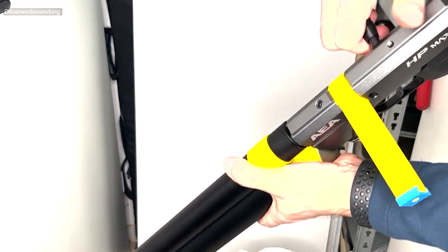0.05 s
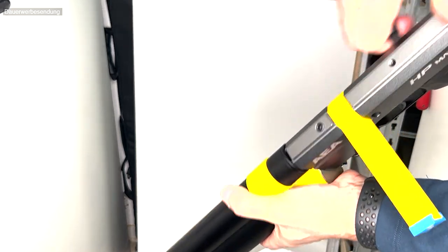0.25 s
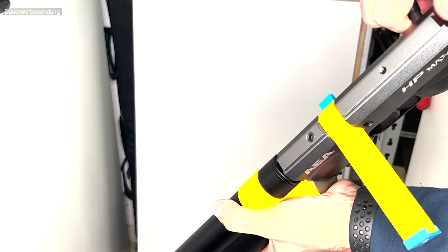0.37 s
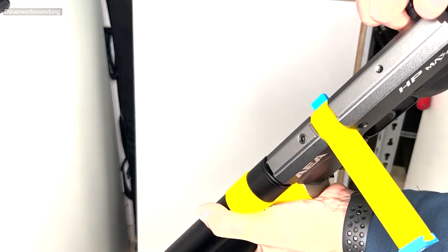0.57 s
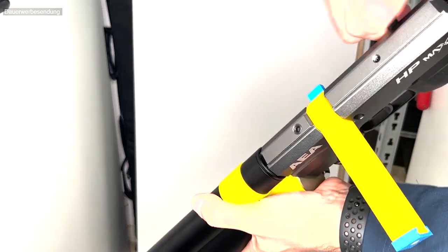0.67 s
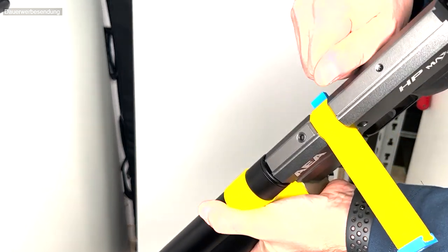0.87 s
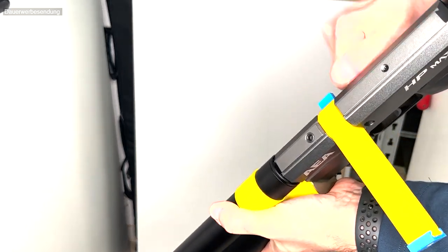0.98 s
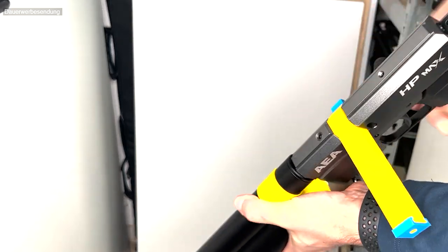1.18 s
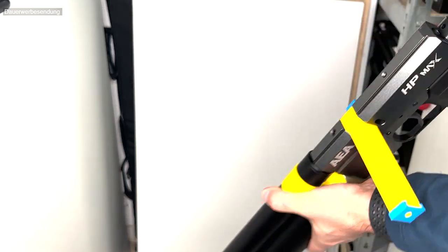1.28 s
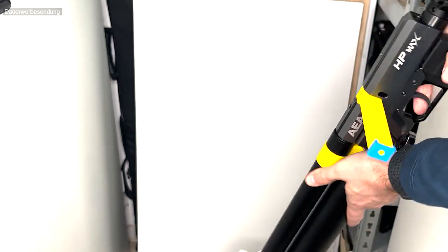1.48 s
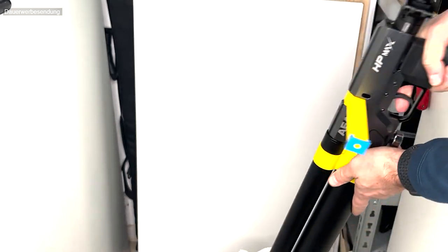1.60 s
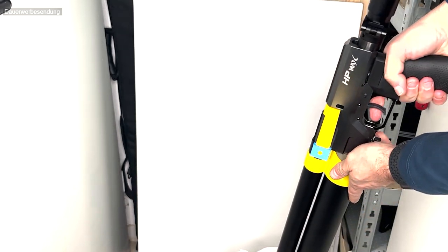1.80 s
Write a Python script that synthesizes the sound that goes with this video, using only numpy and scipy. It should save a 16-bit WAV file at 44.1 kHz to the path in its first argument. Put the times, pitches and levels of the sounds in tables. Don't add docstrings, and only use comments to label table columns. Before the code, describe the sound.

An air rifle's metal lever is worked close to a phone in a small workshop. After faint palm rubbing, it clatters back at 0.2-0.3 s with gritty steel scrapes, ringing knocks and a low tube hum. It slides forward from 0.6 s, the hardest, brightest snap landing near 0.73 s. A lighter latch click comes at 1.0 s, then quiet hand rustle and tiny ticks until about 1.85 s, over short room reverberation and faint hiss.

```python
import sys
import numpy as np
from scipy import signal
from scipy.fft import rfft, irfft
from scipy.io import wavfile

SR = 44100
rng = np.random.default_rng(int(sys.argv[2]) if len(sys.argv) > 2 else 0)


def to_linear_factor(level_db):
    exponent = np.asarray(level_db, float) / 20
    return 10 ** exponent


def store_wav(level_fs):
    pcm = np.round(np.clip(np.atleast_2d(level_fs), -1, 1) * 32767)
    wavfile.write(sys.argv[1], SR, pcm.T.astype(np.int16))


N = 81585


def unit(x):
    return x / np.sqrt(np.mean(x ** 2))


def read(table, hz, col=1):
    table = np.array(table, float)
    return np.interp(np.log(hz + 1), np.log(table[:, 0]), table[:, col])


def passed(x, kind, hz):
    return signal.sosfilt(signal.butter(2, hz, kind, fs=SR, output="sos"), x)


def band(x, hz):
    return unit(passed(x, "band", [hz / 1.7, hz * 1.7]))


def colour(x, table):
    cepstrum = irfft(np.log(to_linear_factor(read(table, np.fft.rfftfreq(2048, 1 / SR)))))
    cepstrum[1:1024] *= 2
    cepstrum[1025:] = 0
    h = irfft(np.exp(rfft(cepstrum)))[:1024]
    return signal.fftconvolve(x, h / np.sqrt(np.sum(h ** 2)))[:len(x)]


def fade(t, t60):
    return np.exp(-np.log(1000) * t / t60)


def ring(hz, db, t60, length):
    t = np.arange(int(length * SR))[:, None] / SR
    return np.sum(to_linear_factor(db) * np.sin(2 * np.pi * hz * t) * fade(t, t60), axis=1)


def cluster(hz, db, t60, chance):
    detune, uneven = chance[:16 * len(hz)].reshape(2, -1)
    hz, db, t60 = (np.repeat(v, 8) for v in (hz, db, t60))
    h = ring(hz * (1 + .06 * detune), db + 3 * uneven, np.minimum(t60, .055), .08)
    return h / np.sqrt(np.sum(h ** 2))


def add(out, s, x):
    i = int(s * SR)
    out[i:i + len(x)] += x[:N - i]


def grains(curve, spread_db):
    grains_per_s = 7000
    t, curve, chance = np.arange(N) / SR, np.array(curve), rng.random((3, N))
    hit = chance[0] < grains_per_s / SR
    size = to_linear_factor(-spread_db * np.log(1 - .97 * chance[2]))
    clicks = hit * np.sign(chance[1] - .5) * size
    return unit(clicks) * to_linear_factor(np.interp(t, curve[:, 0], curve[:, 1], -140, -140))


# (f/Hz, level/dB)
CONTACT = [(100, -60), (400, -11.5), (1000, -10), (1800, 4.5), (4800, -1.5), (8000, -3.5), (13000, -7)]


def slide(x, modes, ring_db):
    bare_db = -2
    h = cluster(*np.array(modes).T, rng.standard_normal(240))
    return to_linear_factor(ring_db) * signal.fftconvolve(x, h)[:N] + to_linear_factor(bare_db) * colour(x, CONTACT)


# (t/s, level/dB)
STROKES = [
    [(.185, -54.5), (.195, -34.5), (.203, -25.5), (.215, -33), (.245, -32), (.256, -25.5), (.27, -29.5),
     (.295, -26.5), (.315, -33)],
    [(.585, -72), (.605, -52.5), (.617, -34), (.636, -34.5), (.648, -20.5), (.669, -30.5), (.726, -35),
     (.734, -28), (.82, -56.5)],
    [(.96, -57.5), (.975, -55.5), (.981, -46), (.99, -27), (1.005, -22), (1.03, -46), (1.048, -37.5)],
]
# (f/Hz, level/dB, t60/s)
BACK = [(1248, -7, 0.2), (1900, -10.5, 0.15), (1966, 4.5, 0.23), (3140, -5, 0.24), (3870, 1, 0.055),
        (4400, -4, 0.045), (6440, -14.5, 0.14), (7350, -11, 0.028), (8190, 1.5, 0.04)]
HOME = [(770, -45, 0.17), (1984, 3, 0.16), (2580, -2.5, 0.24), (3200, 3, 0.02), (4200, -1, 0.027),
        (4760, -8.5, 0.18), (5600, -3, 0.13), (7655, -4, 0.18)]
LATCH = [(1710, -4, 0.15), (2029, 4, 0.18), (2508, -1, 0.15), (3370, -3.5, 0.16), (3920, 0.5, 0.033),
         (4900, -1.5, 0.023), (6900, -18, 0.1), (8000, -5.5, 0.028)]


def lever():
    return sum(slide(grains(c, 3.5), modes, -5) for c, modes in zip(STROKES, (BACK, HOME, LATCH)))


# (t/s, peak level/dB, ring
# f/Hz, crack level against ring/dB, chatter/ms)
KNOCKS = [(0.1985, -18, 4277, -4.5, 2.4), (0.2559, -15.5, 1860, 17, 2), (0.2601, -11.5, 1900, 2, 1.3),
          (0.262, -15.5, 8020, 0.5, 1.3), (.279, -14.5, 2243, 4.5, 0.79), (.361, -34, 1980, -16, 10),
          (0.621, -22.5, 3200, -8, 1.5), (0.632, -33.5, 8000, -8, 0.61), (0.6439, -17.5, 3342, 17.5, 3),
          (.649, -17, 4710, 6.5, 4.3), (0.689, -18, 2173, -4, 1.1), (0.7291, -11, 7480, 14, 0.74),
          (0.735, -14.5, 2510, -4, 2.7), (0.74, -18, 4320, 1.5, 4.3), (.97, -39.5, 4900, -10, 7.6),
          (0.997, -20, 4200, 4.5, 1.3), (1.005, -20.5, 2074, -3, 3.4), (1.024, -18.5, 1710, -8, 2.1),
          (1.036, -24.5, 1774, -7.5, 2), (1.107, -40.5, 7760, 11.5, 1.7),
          (.179, -50.5, 3280, -5, 0.84),
    (1.212, -48.5, 2120, 15.5, 1.95),
    (1.359, -51.5, 1700, 12, 12.5),
    (1.449, -55.5, 3040, -5, 2),
    (1.474, -42.5, 900, -4, 2.46),
    (1.51, -43, 1730, -24, 9.6),
    (1.566, -41.5, 1830, 4.5, 5.7),
    (1.801, -66.5, 2226, -11, 10.7),
    (1.84, -56, 3020, 20, 4.4),
          (0.2012, -15.5, 4290, 4.5, 1.5), (.2525, -31.5, 13560, -6, 2.4), (0.2673, -14, 12370, 2.5, .5),
            (0.272, -24, 7760, 4.5, 0.28), (0.2801, -14.5, 7600, 1, 0.83), (0.2894, -23.5, 2130, 3.5, 2),
            (0.3, -19, 1512, -1, 2), (0.6121, -32.5, 6900, 2, 5), (0.7282, -17.5, 12980, 3.5, .5),
            (0.7504, -22.5, 4640, 1.5, 1.9), (.974, -43, 12300, 9, 1), (.9855, -25, 4350, 0.5, 5.1),
            (0.9982, -21.5, 11770, 10, 1), (1.0453, -37.5, 1957, -11, 1.2), (1.286, -59, 2520, 0.5, 2.5),
            (1.565, -42, 7370, 11, 1)]
# (f/Hz, level/dB)
CRACK = [(300, -32), (2000, -3.5), (6000, -1.5), (13000, 1.5)]


def knocks():
    near_oct, ring_share, own_t60_s = .7, .5, .012
    rings, cracks = np.zeros(N), np.zeros(N)
    events = KNOCKS
    for (s, db, hz, crack_db, ms), c in zip(events, rng.standard_normal((len(events), 2200))):
        modes = BACK if s < .5 else HOME if s < .9 else LATCH
        f, g, t60 = np.array(modes).T
        near_db = g - 6 * (np.log2(f / hz) / near_oct) ** 2
        t = np.arange(len(c)) / SR / (max(ms, .3) / 1000)
        push = c * (1 - np.exp(-t / .16)) * np.exp(-t)
        h = cluster(np.append(f, hz), np.append(near_db - 4, 0), np.append(ring_share * t60, own_t60_s), c[::-1])
        x = signal.fftconvolve(push, h)
        add(rings, s, to_linear_factor(db + 2.5) * x / np.max(abs(x)))
        add(cracks, s, to_linear_factor(db + crack_db - 14.5) * push)
    return passed(rings, "high", 900) + colour(cracks, CRACK)


# (t/s, peak level/dB, lowest f/Hz)
SNAPS = [
    (0.2675, -16, 6000),
    (0.632, -24, 5100),
    (.7295, -5, 2500),
    (0.973, -37, 6020),
    (1.1079, -35, 2500),
    (1.213, -49.5, 2000),
    (1.5657, -40, 4050),
]


def snaps():
    decay_s = .00035
    out, t = np.zeros(N), np.arange(200) / SR
    for (s, db, hz), c in zip(SNAPS, rng.standard_normal((len(SNAPS), len(t)))):
        clicks = np.sign(c) * (np.abs(c) > 1) * np.exp(-t / decay_s)
        x = passed(clicks, "high", hz)
        add(out, s, to_linear_factor(db) * x / np.max(abs(x)))
    return out


# (t/s, level/dB, f/Hz, t60/s)
PINS = [(.197, -35.5, 2960, 0.11), (0.26, -34, 4760, 0.089), (0.23, -48.5, 870, 0.051),
        (.293, -37.5, 480, 0.071), (.255, -30, 1720, .05), (.745, -43, 840, .1), (.735, -35, 3800, 0.14),
        (.735, -37, 3000, .12), (1.0, -32, 1500, 0.12), (1.592, -59, 4500, .08)]


def pins():
    rise_s, wobble = .004, .015
    out = np.zeros(N)
    for (s, db, hz, t60), c in zip(PINS, rng.standard_normal((len(PINS), 12))):
        x = ring(hz * (1 + wobble * np.clip(c[:6], -1.5, 1.5)), db - 4 + 2 * c[6:], t60, .3)
        add(out, s, x * (1 - np.exp(-np.arange(len(x)) / SR / rise_s)))
    return out


# (t/s, level/dB, f/Hz, t60/s, rise/ms, hand stops it t/s)
HUMS = [
    (0.201, -27, 224.2, 0.26, 16, .227),
    (.315, -43.5, 244.3, 0.26, 7.4, 0.39),
    (0.654, -40, 245, 0.35, 6, 0.88),
    (.736, -21.5, 243.5, 0.22, 12, 0.85),
    (0.999, -44, 188.8, 0.18, 5.5, 1.1),
]


def hums():
    out, t = np.zeros(N), np.arange(N) / SR
    for s, db, hz, t60, ms, stop in HUMS:
        rise = np.sin(np.pi / 2 * np.clip(t * 1000 / ms, 0, 1)) ** 2
        damped = np.exp(-np.maximum(t + s - stop, 0) / .007)
        add(out, s, ring(hz, db, t60, 3)[:N] * rise * damped)
    return out


# (t/s, level/dB, centre f/Hz, t60/s)
BUMPS = [(0.274, -30.5, 126, 0.11), (0.302, -32, 130, .08), (0.293, -29.5, 560, 0.1),
         (0.641, -46, 112, 0.19), (0.739, -54, 65, 0.44), (0.994, -48.5, 131, 0.15),
         (1.108, -45.5, 343, 0.14), (1.215, -59, 250, 0.24), (1.475, -54, 588, 0.18),
         (1.512, -48.5, 150, 0.055)]


def bumps():
    out, t = np.zeros(N), np.arange(SR // 3) / SR
    for (s, db, hz, t60), c in zip(BUMPS, rng.standard_normal((len(BUMPS), len(t)))):
        add(out, s, to_linear_factor(db) * band(c, hz) * (1 - np.exp(-t / .005)) * fade(t, t60))
    return out


# (t/s, level/dB)
HANDS = [
    [(0, -61.5), (.035, -62), (.055, -74), (.11, -80.5), (.16, -95)],
    [(1.1, -62), (1.115, -46), (1.14, -83), (1.2, -99), (1.216, -59), (1.255, -68)],
    [(1.33, -74.5), (1.365, -68), (1.43, -71.5), (1.47, -61), (1.508, -51), (1.55, -64.5)],
    [(1.55, -59), (1.57, -53.5), (1.62, -59), (1.7, -80), (1.83, -95), (1.85, -66.5)],
]


def hands():
    rustle = sum(grains(c, 5.5) for c in HANDS)
    return slide(colour(rustle, [(300, 5.5), (2500, -2), (12000, -7)]), LATCH, -7)


def palm():
    level_db, centre_hz = -57, 330
    t = np.arange(N) / SR
    return to_linear_factor(level_db) * band(rng.standard_normal(N), centre_hz) * np.clip((.17 - t) / .08, 0, 1)


def sides(x):
    side_db, turn_s = -3.5, .025
    h = rng.standard_normal((6, 600)) * np.exp(-np.arange(600) / SR / .002)
    h = passed(h / np.sqrt(np.sum(h ** 2, axis=1, keepdims=True)), "band", [400, 6500])
    turn, blur = np.arange(N) / SR / turn_s, 0
    for k in range(6):
        facing = np.cos(np.pi / 2 * np.clip((turn - k + 3) % 6 - 3, -1, 1))
        blur = blur + signal.fftconvolve(x * facing, h[k])[:N]
    return x + to_linear_factor(side_db) * np.array([[1], [-1]]) * blur


def wide(left, right, same_hz):
    same_above_hz = 7000
    hz = np.fft.rfftfreq(len(left), 1 / SR)
    bass, top = 1 / (1 + (hz / same_hz) ** 2), .9 / (1 + (same_above_hz / (hz + 1)) ** 4)
    c = np.clip(bass + top, 0, 1)
    mid, side = np.sqrt(1 + c) * rfft(left), np.sqrt(1 - c) * rfft(right)
    return irfft(np.array([mid + side, mid - side]) / np.sqrt(2), len(left))


# (f/Hz, t60/s)
ROOM = [(300, .3), (3000, 0.23), (8000, 0.2), (14000, 0.18)]


def room(x):
    room_db, gap_s, top_db = -4.5, .0018, -1.5
    t, h = np.arange(SR // 2) / SR, 0
    noise = wide(*rng.standard_normal((2, len(t))), 210)
    for hz in 80 * 2 ** np.arange(8.):
        octave = passed(noise, "band", [hz / np.sqrt(2), hz * np.sqrt(2)])
        t60 = read(ROOM, hz)
        h = h + to_linear_factor(top_db * (hz > 8000)) * octave * fade(t, t60) / np.sqrt(t60)
    h = h * np.clip(t / gap_s, 0, 1) ** 2
    h = h / np.sqrt(np.sum(h ** 2) / 2)
    return to_linear_factor(room_db) * signal.fftconvolve(x[None], h, axes=1)[:, :N]


# (f/Hz, level/dB)
FLOOR = [(30, -17.5), (60, 2), (118, 10.5), (776, -5.5), (2020, -19), (9930, -25.5), (14000, -17.5)]


def floor():
    left, right = (colour(v, FLOOR) for v in rng.standard_normal((2, N)))
    return unit(wide(left, right, 400)) * to_linear_factor(-67.5)


def scene():
    steel = lever() + hands() + knocks() + pins()
    low = hums() + bumps() + palm()
    snap = snaps()
    return sides(steel) + low + snap + room(steel + .037 * low + to_linear_factor(-12.5) * snap) + floor()


# (f/Hz, left lead/rad, left minus right level/dB)
PORTS = [(60, -1.2, 2.4), (247, 0.56, 0), (900, -2.03, 0.3), (2230, -0.97, 1.5), (4980, -1.39, -9),
         (7180, -6, 2), (10030, -3, 0.5), (16100, 3.5, -1.2)]
# (f/Hz, level/dB)
MIC = [(30, -32), (90, -5), (200, -5.5), (9200, 4.5), (9950, -10.5), (10500, 2.5), (13900, -5), (15600, -6)]


def ports(x):
    hz = np.fft.rfftfreq(N, 1 / SR)
    turn = np.exp(.5j * read(PORTS, hz)) * to_linear_factor(read(PORTS, hz, col=2) / 2)
    return irfft(rfft(x) * np.array([turn, 1 / turn]) * to_linear_factor(read(MIC, hz)), N)


def low_pass(x):
    return signal.sosfilt(signal.butter(12, 16500, fs=SR, output="sos"), x)


def record(dry):
    top_hz, headroom = 16200, 1.1
    heard = signal.sosfilt(signal.ellip(8, .2, 60, top_hz, fs=SR, output="sos"), ports(dry))
    mix = headroom * np.tanh(heard / headroom)
    return low_pass(mix)


dry = scene()
out = record(dry)
store_wav(out)
```